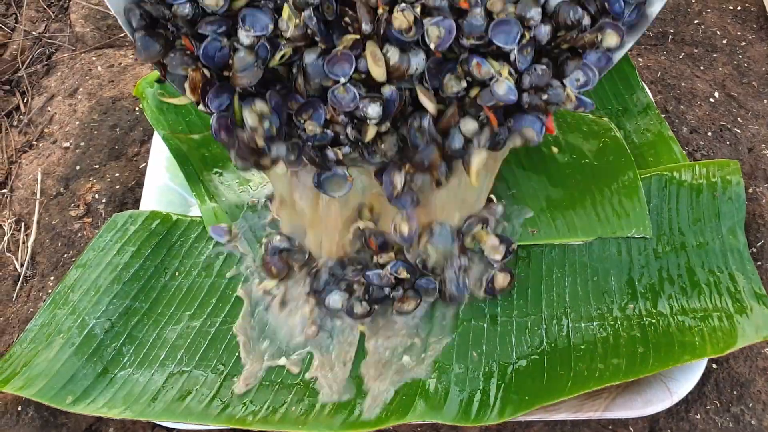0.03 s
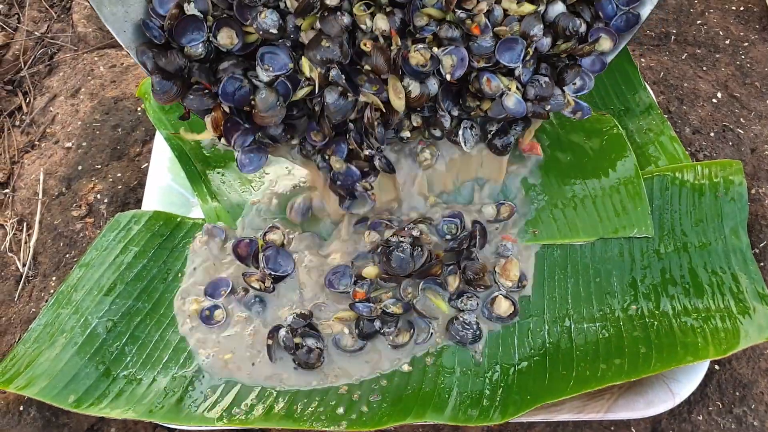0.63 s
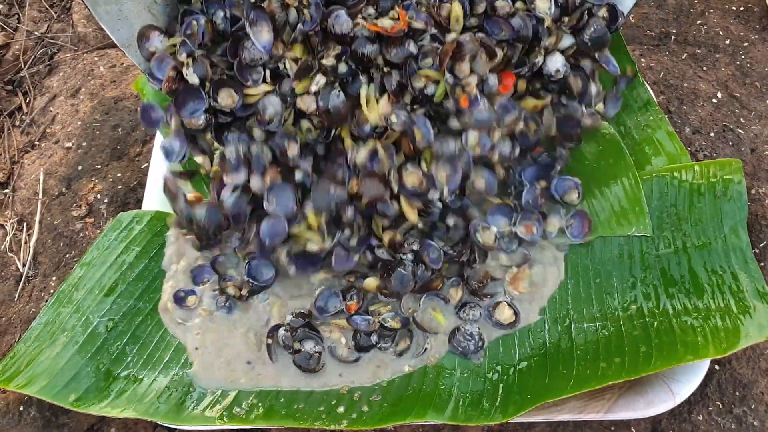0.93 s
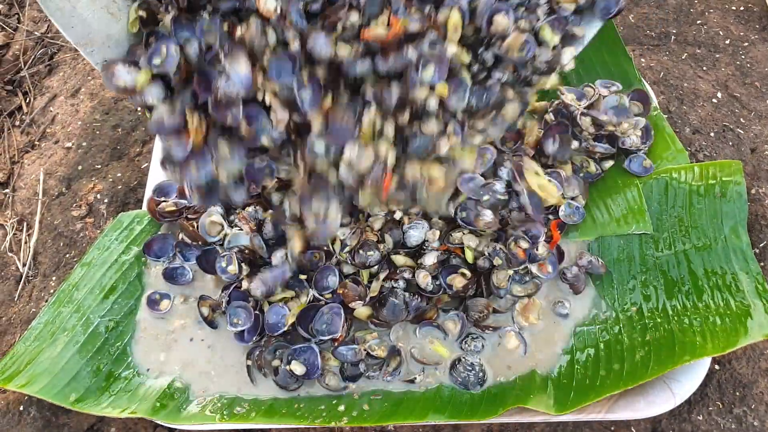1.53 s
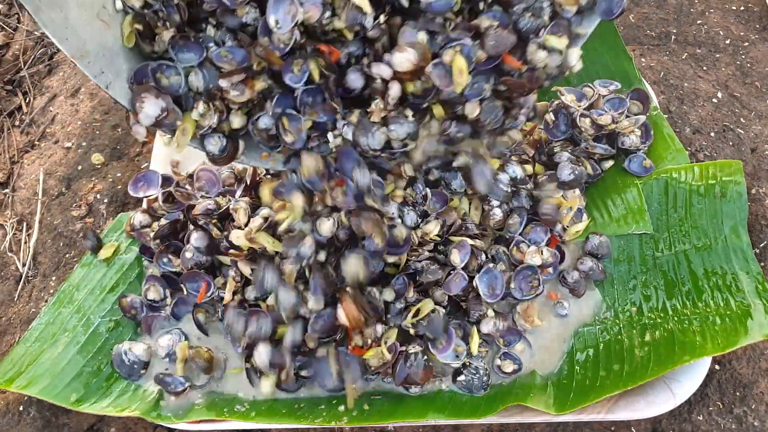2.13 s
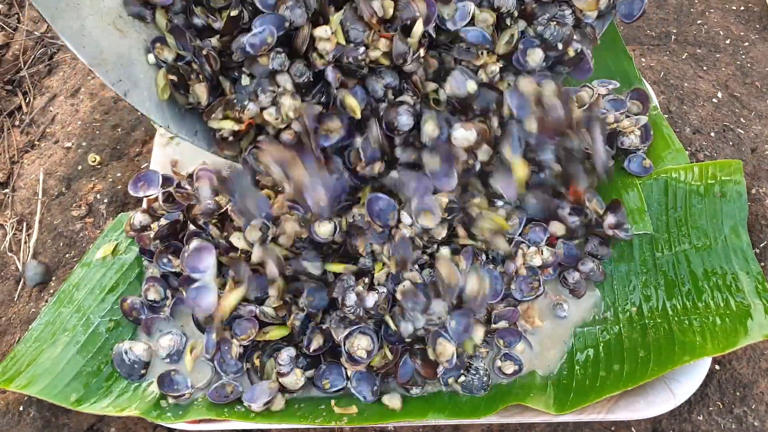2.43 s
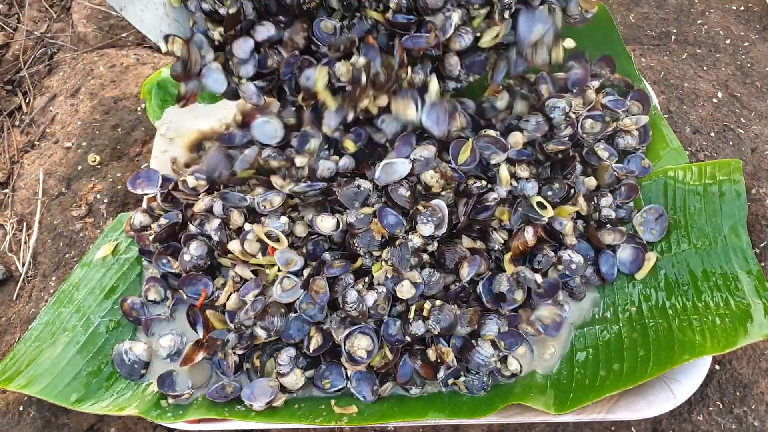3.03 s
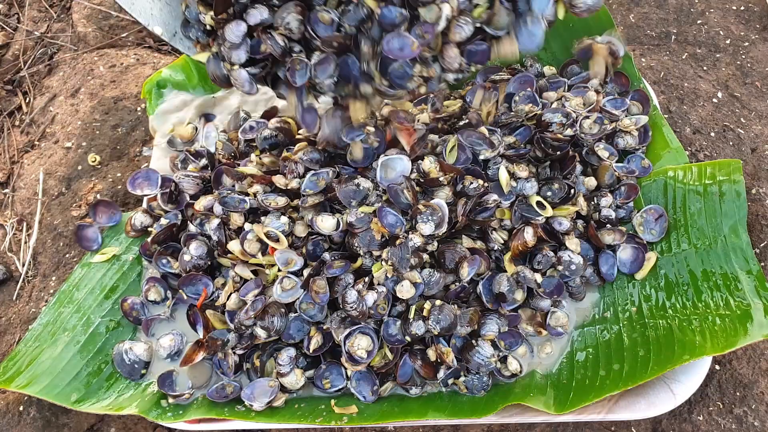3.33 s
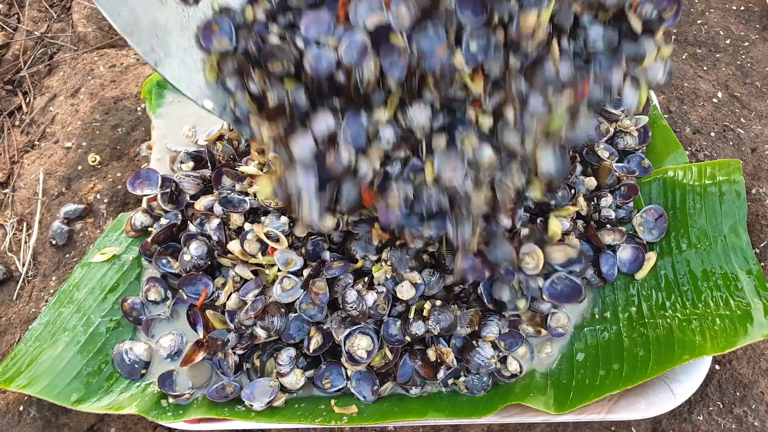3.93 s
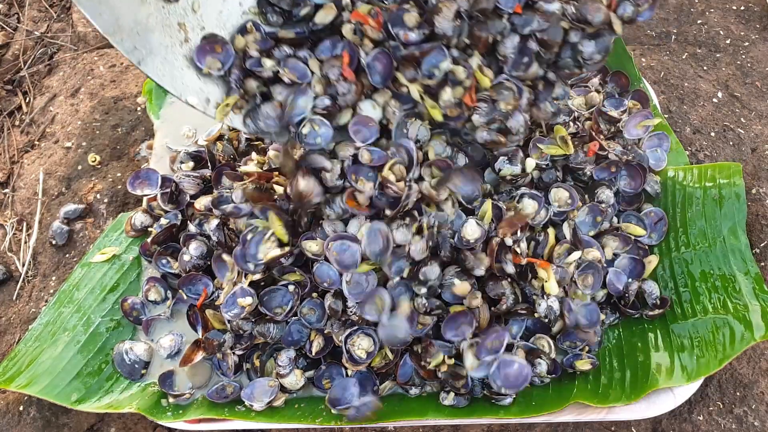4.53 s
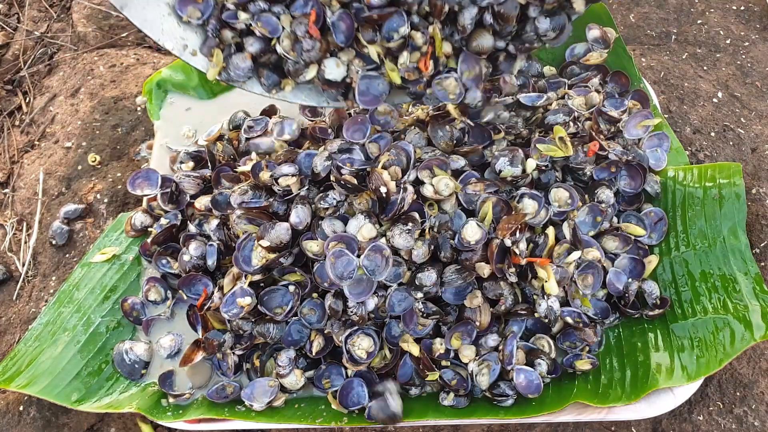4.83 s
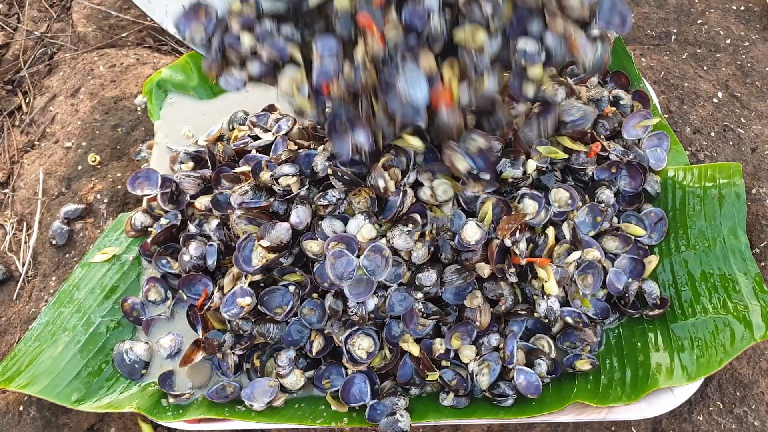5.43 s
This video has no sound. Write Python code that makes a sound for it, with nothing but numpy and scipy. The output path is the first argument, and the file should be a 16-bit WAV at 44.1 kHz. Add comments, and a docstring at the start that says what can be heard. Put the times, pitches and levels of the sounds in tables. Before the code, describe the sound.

Close up and outdoors, small wet shells tumble onto a leaf-covered tray with soft thuds and crisp clacks. The metal pan is then shaken about eight times at an uneven pace, each shake a brief scrape of shells on metal with a damped ring. Between and over the scrapes, clams pour out in clattering surges and click against one another on the pile. The background is very quiet.

```python
"""Cooked clams rasp over a metal pan as they are shaken out onto a leaf-lined tray, close by, outdoors.
Each shake sets off thousands of tiny shell-on-metal slips and rubs a damped mode of the pan.
Wet shells spill over the rim and click on one another; clumps knock the tray through the leaves.
A faint low hum and still air lie underneath."""
import sys
import numpy as np
from scipy import signal
from scipy.fft import rfft, irfft
from scipy.io import wavfile
from scipy.ndimage import uniform_filter1d

SR = 44100
rng = np.random.default_rng(int(sys.argv[2]) if len(sys.argv) > 2 else 0)


def waveform_to_disk(signal):
    """Save audio, clipped to [-1, 1], as 16-bit WAV at the path in sys.argv[1]."""
    frames = np.transpose(np.atleast_2d(signal))
    scaled = np.clip(frames, -1, 1) * 32767
    samples = np.round(scaled).astype(np.int16)
    wavfile.write(sys.argv[1], SR, samples)


N = 246959

# pan shakes: fastest_slide_s, level_db, rise_20db_s, fall_20db_s, ring_hz
SHAKES = [(0.376, -40, .03, .07, 1700), (0.508, -46, .04, .033, 1850), (0.925, -19.7, .26, .12, 1850),
          (1.565, -24.8, .077, .072, 2250), (2.342, -19.2, .068, .072, 1550),
          (2.857, -17.6, .082, .078, 1310), (3.942, -21.3, .074, .069, 1380),
          (4.385, -22.5, .066, .095, 1320), (5.025, -23.5, .056, .07, 1430), (5.508, -21.3, .07, .1, 1620)]


def rasp(gain_db=1.44, slips_per_s=7000, spread_db=2.0, slip_s=0.00069, split_hz=3200,
         treble_lag_s=0.002, grains=16, size=200):
    """Shells slip on metal; each slide brightens as it goes, and the colour shifts as the pan empties."""
    # rasp spectra by pan load: freq_hz, level_db
    full = [(100, -23), (200, -20), (450, -11), (800, -13), (1100, -5), (1700, -1.5), (2300, 3.5),
            (3500, -6), (5500, -14.5), (15000, -27)]
    half = [(100, -37.5), (400, -15), (900, -21), (1350, -9), (1900, -4), (2400, 4.5), (3200, -4),
            (5000, -11.5), (15000, -38.5)]
    light = [(150, -34.5), (500, -22.5), (900, -33), (1150, -20), (1480, -13.5), (1850, -13.5), (2650, 2.5),
             (3600, -8), (5000, -13), (15000, -28)]
    # pan load times: full_s, half_s, light_s
    load_times_s = [0.51, 2.2, 5.25]
    t = np.arange(N) / SR
    fade = np.exp(-t[:size] / slip_s)
    slips = sum(play(impacts(slips_per_s / grains, spread_db), fade * rng.standard_normal((2, size)))
                for _ in range(grains))
    shares = [np.interp(t, load_times_s, row) for row in np.eye(3)]
    scrape = sum(share * unit(colour(slips, tone)) for share, tone in zip(shares, (full, half, light)))
    dull = signal.sosfiltfilt(signal.butter(2, split_hz, fs=SR, output="sos"), scrape)
    early, late = (sum(slide(shake, lag_s) for shake in SHAKES) for lag_s in (0, treble_lag_s))
    return amp(gain_db) * (dull * early + (scrape - dull) * late)


def slide(shake, lag_s=0, friction=0.03):
    """Envelope of one shake: the heap speeds up, friction stops it; under a weak push it sticks."""
    fastest_s, level_db, rise_s, fall_s, _ = shake
    t = np.arange(N) / SR - fastest_s - lag_s
    away = t / np.where(t < 0, rise_s, fall_s)
    push = amp(20 - 20 * np.sqrt(1 + 3 * away ** 2))
    return amp(level_db) * np.maximum(push - friction, 0)


def pan_ring(gain_db=-12, lead_s=0.0061, width_hz=190):
    """The heap breaks loose and rubs one damped pan mode; the load shifts its pitch between shakes."""
    rub, out = rng.standard_normal((2, N)), np.zeros((2, N))
    for shake in SHAKES:
        ring_hz = shake[-1]
        mode = signal.iirpeak(ring_hz, ring_hz / width_hz, fs=SR)
        ring = signal.lfilter(*mode, signal.lfilter(*mode, rub))
        out += unit(ring) * slide(shake, -lead_s)
    return amp(gain_db) * out


def tumble(gain_db=1.6, shells_per_s=480, spread_db=3.0, thinning=0.8, fizz_db=-19, clump_db=3.5, count=36):
    """Shells of many sizes land in clumps and click over a wet fizz; a weak flow has fewer clicks."""
    # tumbling shell spectrum: freq_hz, level_db
    spectrum = [(150, -37), (250, -19.5), (499, -13), (729, -13), (852, -12.5), (1080, -8.5), (1180, -9),
                (1790, -7), (2570, -4.5), (5130, -4.5), (7900, 0.5), (10200, 0.5), (15500, -9.5)]
    flow = shell_flow()
    clumps = amp(clump_db * unit(uniform_filter1d(rng.standard_normal(N), size=700)))
    density = unit(flow) ** thinning
    clicks = np.zeros((2, N))
    for ring_hz in np.linspace(1800, 15000, count):
        buried = shell(ring_hz, ring_s=0.001)  # damped by wet neighbours
        clicks += play(impacts(density * clumps * shells_per_s / count, spread_db), buried)
    levelled = unit(clicks) / np.sqrt(density + 0.0042)
    fizz = amp(fizz_db) * rng.standard_normal((2, N))
    return amp(gain_db) * flow * unit(colour(levelled + fizz, spectrum))


def shell_flow(swell_db_per_s=255, thin_db=7.5, stop_db_per_s=222):
    """Envelope of the stream over the rim: each spill swells, thins, then stops; spills add in power."""
    # spills, shaken loose or as the heap gives way: start_s, level_db, length_s
    spills = [(0.0, -27.5, 0.077), (0.208, -28, 0.016), (0.377, -34.5, 0.047), (0.793, -40, 0.28),
              (0.963, -26, 0.21), (1.3, -32.5, 0.14), (1.576, -30.5, 0.26), (1.787, -30.5, 0.34),
              (2.127, -32, 0.092), (2.346, -28, 0.11), (2.482, -33, 0.19), (2.824, -28, .19),
              (2.995, -34, 0.48), (3.553, -34.5, 0.08), (3.778, -44, 0.066), (3.947, -29.5, 0.32),
              (4.401, -27, 0.17), (4.6, -34.5, 0.098), (4.895, -46, 0.0091), (5.049, -34, 0.17),
              (5.371, -34, 0.053), (5.504, -26, 0.12)]
    envelopes = []
    for start_s, level_db, length_s in spills:
        t = np.arange(N) / SR - start_s
        early_s, late_s = np.maximum(-t, 0), np.maximum(t - length_s, 0)
        progress = np.clip(t / length_s, 0, 1)
        envelopes.append(amp(level_db - swell_db_per_s * early_s - thin_db * progress
                             - stop_db_per_s * late_s))
    return np.linalg.norm(envelopes, axis=0)


def shell(ring_hz, ring_s=0.0014, crack_s=0.00094, crack=1.02, scatter_s=0.0087, scatter=0.34,
          rise_s=0.0002, size=1300, side_modes=4):
    """One shell impact: crack, damped modes and scatter from the heap; phases differ per channel."""
    t = np.arange(size) / SR
    modes_hz = np.r_[ring_hz, ring_hz * rng.uniform(.55, 1.55, side_modes)].clip(0, SR / 2)[:, None]
    weights = np.r_[1, rng.uniform(.2, .6, side_modes)][:, None]
    phase = 2 * np.pi * (modes_hz * t + rng.random((2, side_modes + 1, 1)))
    ring = (weights * np.sin(phase)).sum(1) * np.exp(-t / ring_s)
    burst_fade = crack * np.exp(-t / crack_s) + scatter * np.exp(-t / scatter_s)
    burst = rng.standard_normal((2, size)) * burst_fade
    return unit((ring + burst) * (1 - np.exp(-t / rise_s)))


def clacks(gain_db=-15.5, graze_s=0.00075, graze_db=-17, decay_spread=0.31, ring_s=0.0028, crack_s=0.0012):
    """Single shells fall from the rim: an edge grazes the heap, then the shell strikes."""
    # clearest landings: start_s, level_db, ring_hz
    landings = [(0.0528, -12.5, 10660), (0.0732, -18, 5840), (0.1077, -19, 8400), (0.1435, -17.5, 5000),
                (0.1562, -11.5, 9060), (0.1891, -11, 9280), (0.214, -12, 11800), (0.2315, -12, 12400),
                (0.2577, -11.5, 7730), (0.3338, -24, 8410), (0.985, -5, 11800), (1.014, -9.5, 7180),
                (1.2574, -18.5, 11300), (1.293, -13, 12100), (1.3644, -20.5, 7490), (2.1748, -14.5, 8200),
                (2.2308, -15, 10400), (2.6574, -22, 10300), (2.7087, -19.5, 10600), (2.9432, -20, 9200),
                (3.2236, -19, 12400), (3.255, -12.5, 10440), (3.469, -24, 6350), (3.526, -21, 11300),
                (3.6194, -19.5, 11340), (3.6568, -21, 7950), (3.691, -24.5, 8110), (3.7584, -28.5, 6840),
                (4.0095, -12.5, 8200), (4.1824, -14.5, 8000), (4.252, -21, 7740), (4.7362, -23.5, 10600),
                (4.787, -28.5, 4360), (4.8363, -26, 10000), (5.348, -20, 7250)]
    # shell body spectrum: freq_hz, level_db
    body = ((300, -19), (1500, -11), (4000, -4), (9000, 0), (15000, -1))
    out = np.zeros((2, N))
    for start_s, level_db, ring_hz in [*landings, *strays()]:
        stretch = np.exp(decay_spread * rng.standard_normal())
        strike = shell(ring_hz, ring_s=ring_s * stretch, crack_s=crack_s * stretch, scatter=0.14)
        add(out, start_s, amp(level_db + graze_db) * shell(ring_hz))
        add(out, start_s + graze_s, amp(level_db) * strike)
    return amp(gain_db) * colour(out, body)


def strays(gain_db=12.5, spread_db=3, linger_s=0.034, low_hz=2570, high_hz=12920, count=110):
    """Loose shells bounce clear, as hard as the stream flows. Rows: start_s, level_db, ring_hz."""
    pole = np.exp(-1 / (linger_s * SR))
    lingering = signal.lfilter([1 - pole], [1, -pole], shell_flow())
    jitter, pitch, force = rng.random((count, 3)).T
    at = ((np.arange(count) + jitter) / count * (N - 1)).astype(int)
    level_db = 20 * np.log10(lingering[at] + 1e-9) + gain_db + spread_db * (2 * force - 1)
    return np.c_[at / SR, level_db, np.interp(pitch, [0, 1], [low_hz, high_hz])]


def knocks(gain_db=-1, place_db=3, detune=0.047, rise_s=0.0009, skew_rad_per_hz=0.00087,
           squash=0.2, squash_s=0.006, size=6000):
    """Wet clumps squash on the leaves; the tray answers dully, its modes weighted by the landing spot."""
    # clump landings: start_s, level_db
    landings = [(0.013, -18), (0.032, -8), (0.073, -16), (0.222, -25), (1.037, -25.5), (1.097, -27),
                (1.807, -29.5), (2.081, -33), (2.211, -25.5), (2.969, -27), (2.999, -25.5), (3.02, -19),
                (3.371, -24.5)]
    # modes of the leaf-lined tray: freq_hz, level_db, t60_s
    tray_modes = [(635, -0.5, 0.07), (666, -2.5, 0.075), (747, -4.5, 0.085), (1080, -1.5, 0.038),
                  (1350, -1, 0.017), (1641, 3, 0.044)]
    out, t = np.zeros((2, N)), np.arange(size) / SR
    mode_hz, mode_db, t60_s = np.transpose(tray_modes)[:, :, None]
    squash_band = signal.butter(2, [620, 2000], "bandpass", fs=SR, output="sos")
    for start_s, level_db in [*landings, *bumps()]:
        polarity, load, place = rng.standard_normal((3, len(tray_modes), 1))
        phase = 2 * np.pi * mode_hz * (1 + detune * load) * t + np.pi * (polarity > 0)
        fade = amp(mode_db + place_db * place - 60 * t / t60_s)
        ring = np.array([(fade * np.sin(phase + skew * mode_hz)).sum(0) for skew in (skew_rad_per_hz, 0)])
        noise = unit(signal.sosfilt(squash_band, rng.standard_normal(size)))
        splat = squash * fade[:, 0].sum() * noise * np.exp(-t / squash_s)
        hit = (ring + splat) * (1 - np.exp(-t / rise_s))
        add(out, start_s, amp(level_db + gain_db) * hit / abs(hit).max())
    return out


def bumps(loss_db_per_s=1.0, count=30):
    """Small clumps reach the tray, ever softer as the heap cushions it. Rows: start_s, level_db."""
    at = rng.integers(0, N, count)
    flow_db = 20 * np.log10(shell_flow()[at] + 1e-9)
    return np.c_[at / SR, flow_db - loss_db_per_s * at / SR]


def distant_hum(waver_rad=0.9, waver_s=0.052):
    """Two low tones wavering in phase together."""
    # hum partials: pitch_hz, rms_db
    partials = [(51.8, -61.5), (102.9, -60.5)]
    t = np.arange(N) / SR
    knots_s = np.arange(0, t[-1] + 1, waver_s)
    drift = np.interp(t, knots_s, rng.standard_normal(len(knots_s)))
    return sum(amp(db) * unit(np.sin(2 * np.pi * hz * t + waver_rad * drift)) for hz, db in partials)


def outdoor_air(gain_db=-52.5):
    """Still air: steady noise, mostly bass."""
    # air spectrum: freq_hz, level_db
    spectrum = [(22, -34), (38, -17), (52, 3.5), (85, -2.5), (150, -7.5), (300, -14), (700, -30),
                (2500, -17), (6000, -25), (15000, -36)]
    return amp(gain_db) * unit(colour(rng.standard_normal((2, N)), spectrum, size=16384))


def spaced_pair(x):
    """Long waves reach both microphones alike, short ones differ; the left one is brighter."""
    # channel likeness: freq_hz, correlation
    likeness = [(100, 0.98), (650, 0.87), (1400, 0.48), (2400, 0), (15000, 0)]
    # channel balance: freq_hz, left_minus_right_db
    balance = [(100, 0.78), (1500, 1.3), (4500, 0.2), (8000, 2.3), (13000, 4.4)]
    hz, spectrum = np.fft.rfftfreq(N, 1 / SR), rfft(x)
    blend_rad = np.arcsin(np.clip(read(likeness, hz), -1, 1)) / 2
    gains = amp(np.outer([.5, -.5], read(balance, hz)))
    return irfft((np.cos(blend_rad) * spectrum + np.sin(blend_rad) * spectrum[::-1]) * gains, N)


def impacts(per_s, spread_db):
    """Random train of blows: many small, a few large."""
    force = np.minimum(rng.exponential(1, N), 3.2)
    return amp(spread_db * force) * (rng.random(N) < per_s / SR)


def play(blows, grain):
    """Sounds a stereo grain at every blow."""
    return signal.oaconvolve(blows[None], grain, axes=1)[:, :N]


def colour(x, points, size=4096):
    """Minimum-phase filter with the given spectrum."""
    log_gain = np.log(amp(read(points, abs(np.fft.fftfreq(size, 1 / SR)))))
    taps = np.fft.ifft(np.exp(np.conj(signal.hilbert(log_gain)))).real[:size // 2]
    return signal.oaconvolve(x, taps[None], axes=1)[:, :N]


def read(points, hz):
    """Interpolates a table over log frequency."""
    points_hz, values = np.transpose(points)
    return np.interp(np.log(hz + 1), np.log(points_hz + 1), values)


def add(mix, start_s, sound):
    """Mixes a stereo sound in place."""
    part = mix[:, max(round(start_s * SR), 0):][:, :sound.shape[1]]
    part += sound[:, :part.shape[1]]


def amp(db):
    """Decibels to gain."""
    return 10 ** (np.asarray(db) / 20)


def unit(x):
    """Scales to rms 1."""
    return x / np.sqrt(np.mean(x ** 2) + 1e-20)


def scene():
    """Pan, shells and tray in the open air."""
    hum, air = distant_hum(), outdoor_air()
    return spaced_pair(rasp() + pan_ring() + tumble() + clacks() + air) + knocks() + hum


def record(dry, cutoff_hz=16000):
    """Steep low-pass band limit."""
    taps = signal.firwin(401, cutoff_hz, window=("kaiser", 8), fs=SR)
    return signal.oaconvolve(dry, taps[None], "same")


dry = scene()
out = record(dry)
waveform_to_disk(out)
```